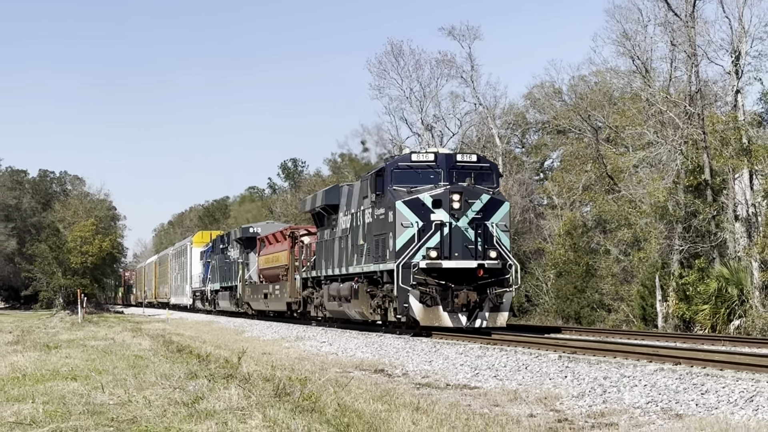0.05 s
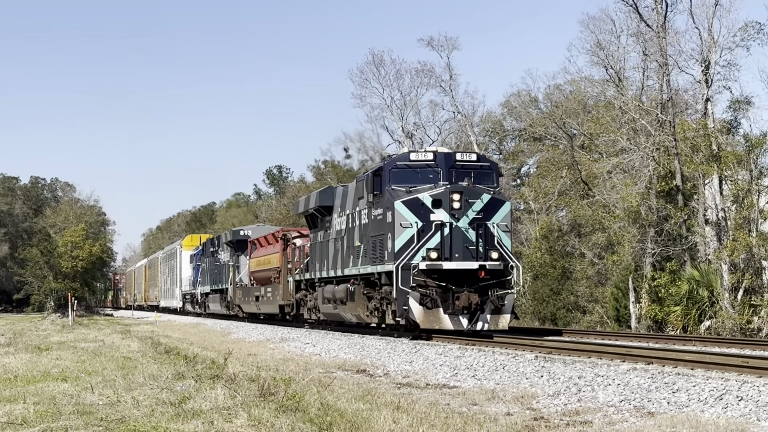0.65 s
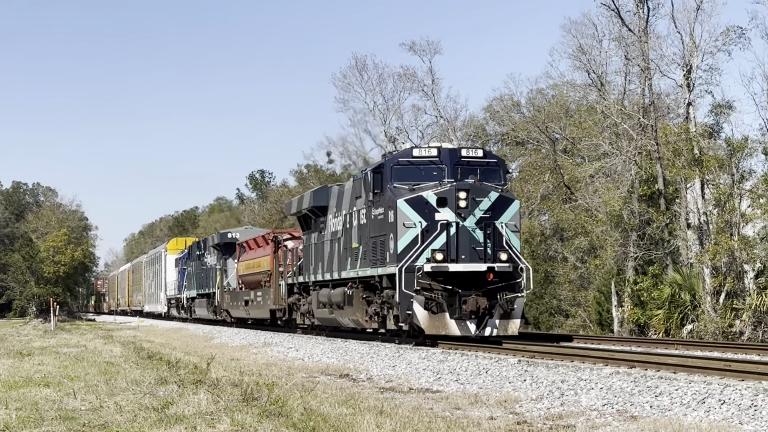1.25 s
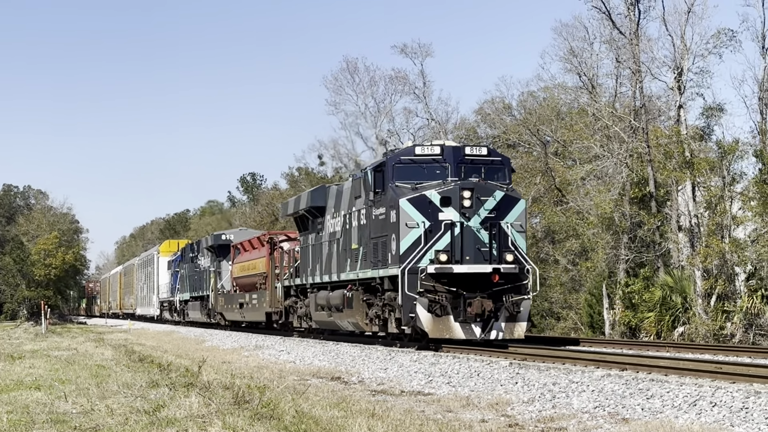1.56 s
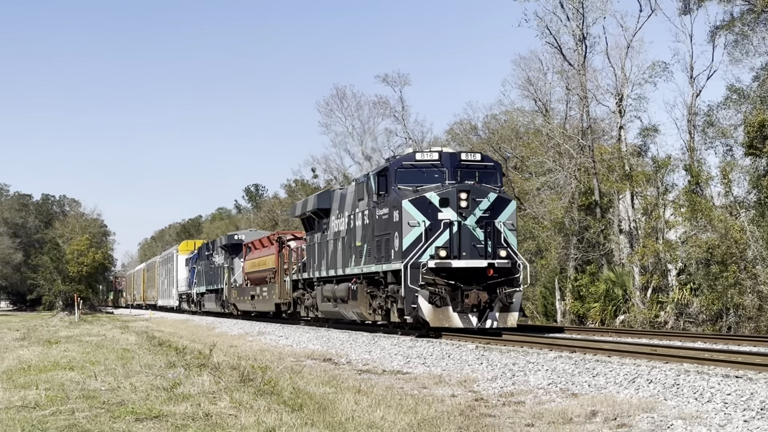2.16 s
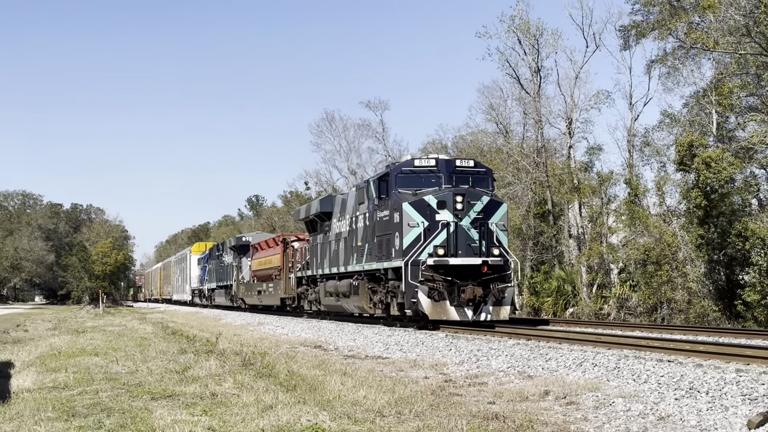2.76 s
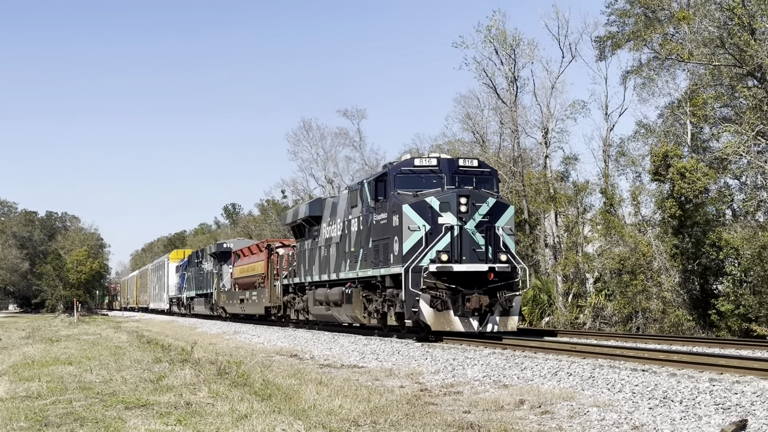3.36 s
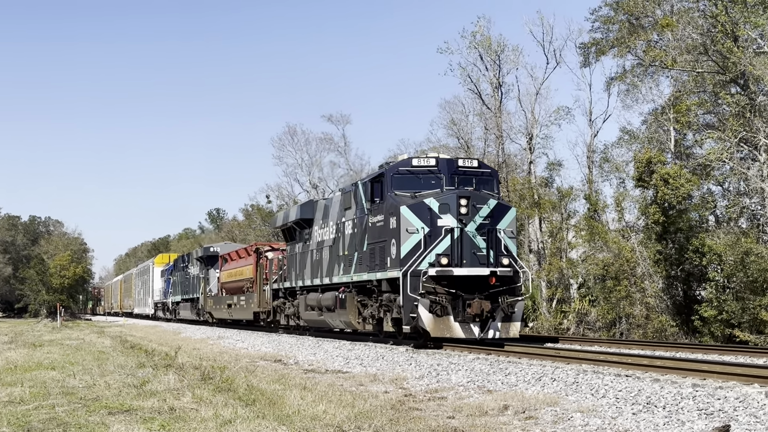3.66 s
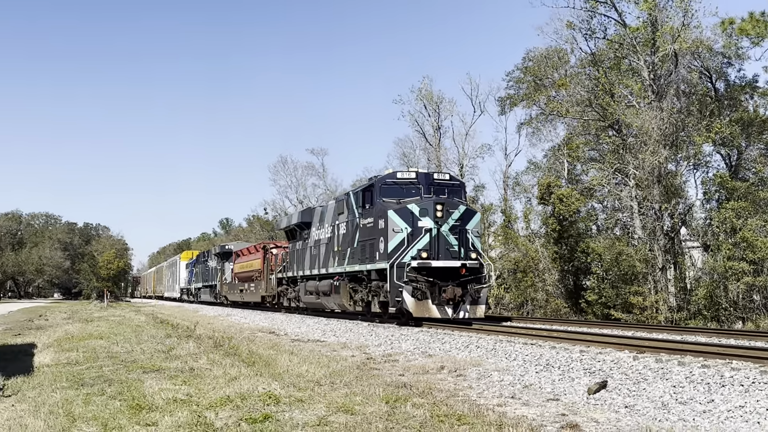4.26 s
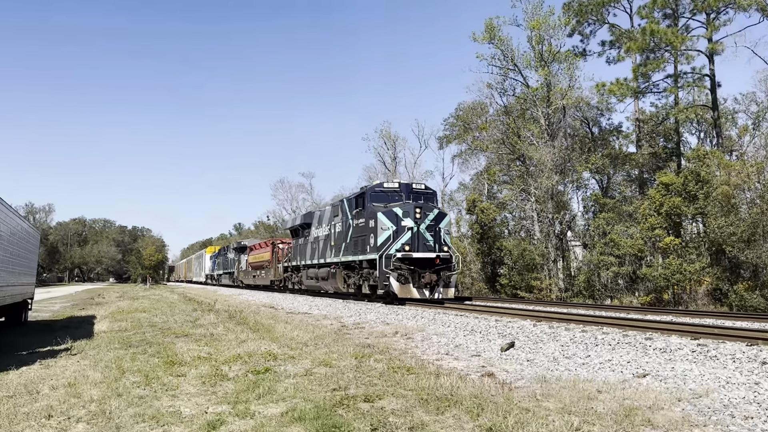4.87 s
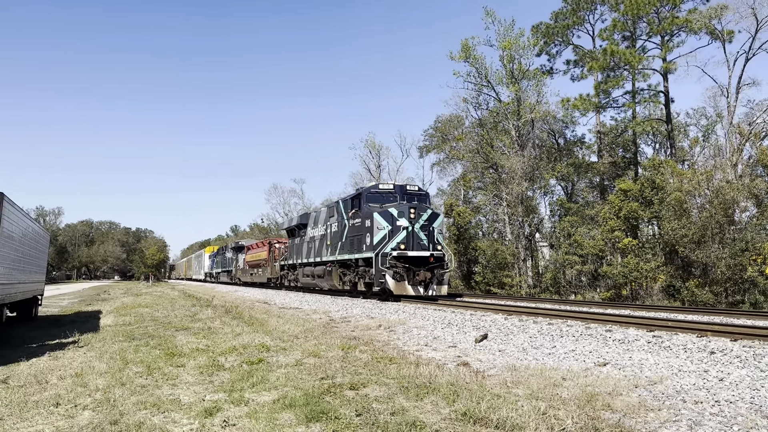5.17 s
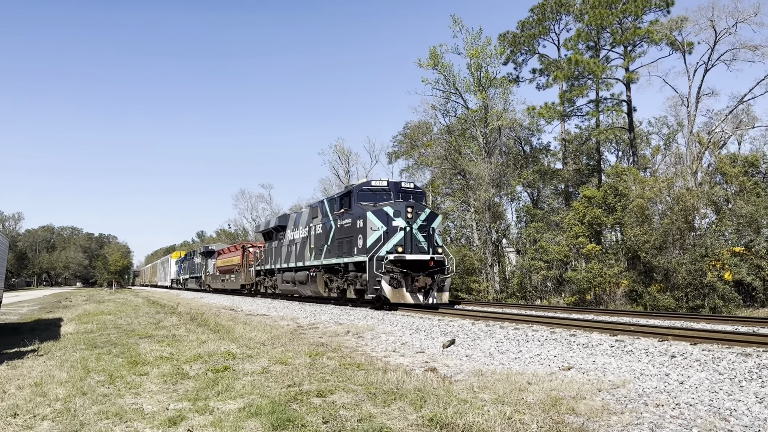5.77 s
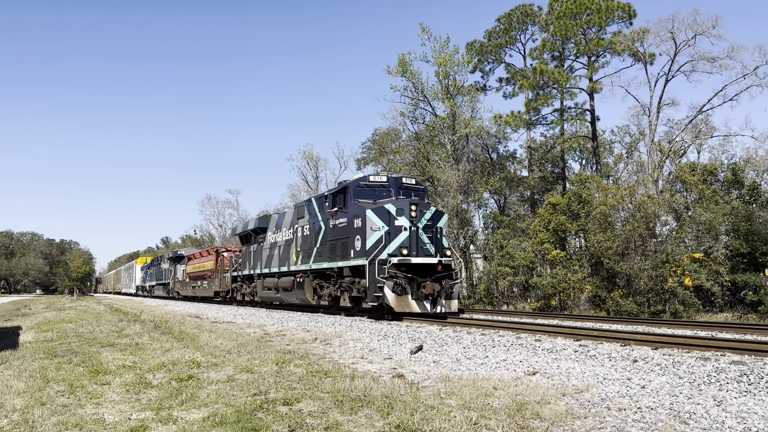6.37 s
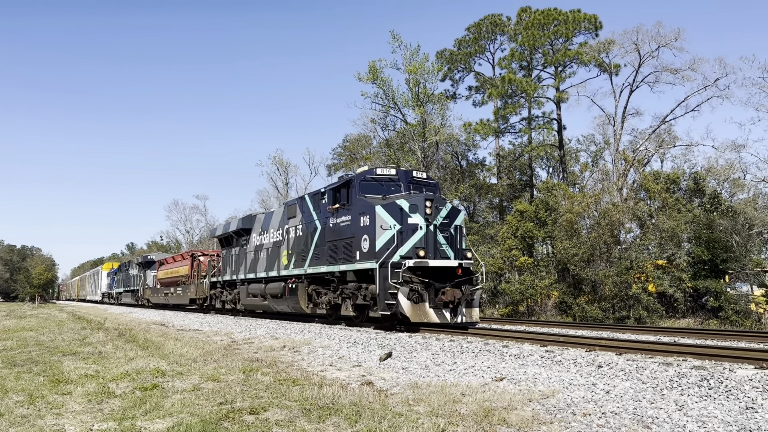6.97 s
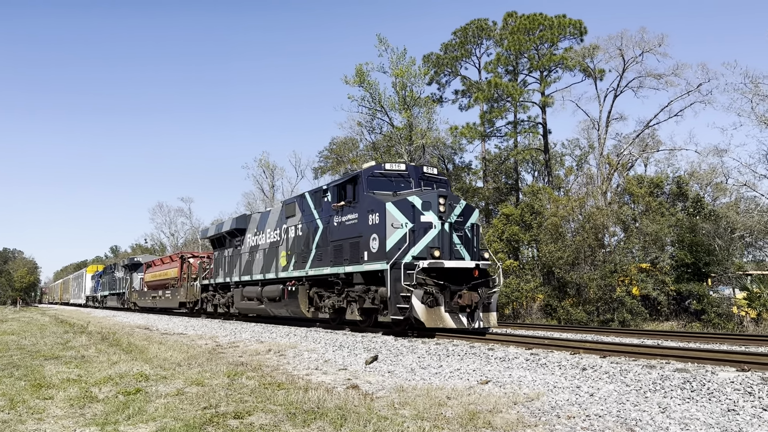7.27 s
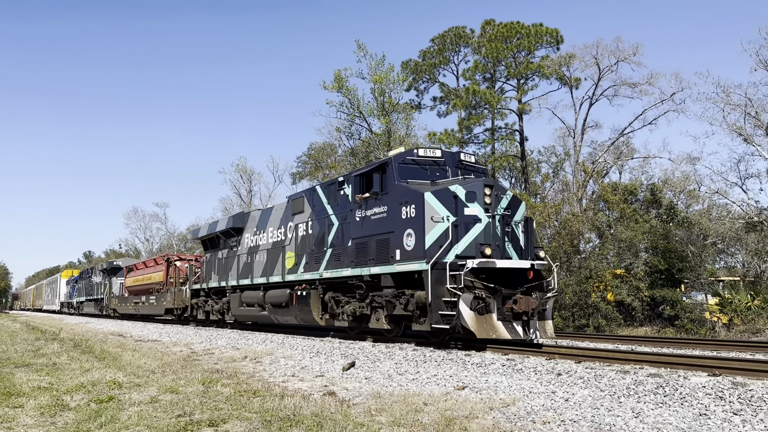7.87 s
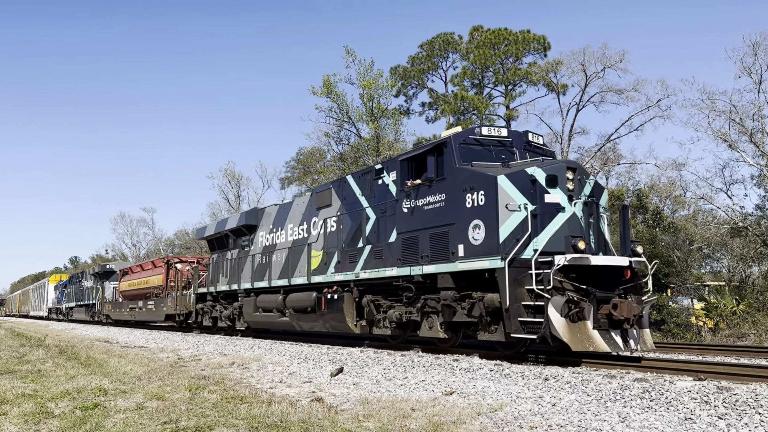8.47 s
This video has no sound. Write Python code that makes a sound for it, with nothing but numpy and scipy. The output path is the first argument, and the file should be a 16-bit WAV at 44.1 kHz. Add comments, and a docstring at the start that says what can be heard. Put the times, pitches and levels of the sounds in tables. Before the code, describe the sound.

A diesel freight train approaches outdoors, heard from beside the track. From the start, the engine gives a deep, steady drone with a fast throb, the main sound throughout. A warning bell strikes evenly, about every 0.7 seconds, echoing softly off the trees. Behind it, a broad roar of fans and rolling wheels, thin blower whines and light engine clatter slowly grow. From about 3 seconds a slightly rising hum swells, peaking near 6 seconds. At about 5 seconds the sound spreads wider between left and right. From 5.8 to 6.5 seconds come three sputtering bursts of hiss, like spitting compressed air, with rough whistles inside. Two brief spits follow around 8 seconds, then a longer, louder whistling sputter from 8.3 seconds until the end at about 8.7, as the roar and whines surge and the locomotive comes close.

```python
"""Beside a railway along a line of trees, a freight train behind diesel locomotives draws near.
Fans, gears and rolling wheels make a growing roar, engine and blowers whine and a warning bell tolls.
The main sound is the twelve-cylinder engine, whose two strongest exhaust tones beat into a throb.
Close by come sputtering bursts of hiss, like spitting compressed air, with rough whistles inside them.
A little past halfway, the sound spreads wider between left and right."""
import sys
import numpy as np
from scipy import signal
from scipy.fft import rfft, irfft, next_fast_len
from scipy.io import wavfile
from scipy.ndimage import uniform_filter1d, minimum_filter1d, map_coordinates

SR = 44100
rng = np.random.default_rng(int(sys.argv[2]) if len(sys.argv) > 2 else 0)


def inscribe(sig):
    """Save sig as 16-bit PCM at rate SR to the path in sys.argv[1].

    A 1-D sig is mono; a 2-D sig holds one channel per row.
    Samples are clipped to [-1, 1] before scaling.
    """
    pcm = np.round(np.clip(np.atleast_2d(sig).T, -1, 1) * 32767)
    wavfile.write(sys.argv[1], SR, pcm.astype(np.int16))


N = 384552
T = np.arange(N) / SR  # the time of every sample
HZ = np.fft.rfftfreq(2 * next_fast_len(N // 2 + SR // 8, real=True), 1 / SR)  # the pitches a filter sets


def amp(db):
    """Turns decibels into a number to multiply a sound by."""
    return 10 ** (np.asarray(db) / 20)


def unit(x):
    """Scales a signal to an average strength (rms) of 1."""
    return x / np.sqrt(np.mean(abs(x) ** 2) + 1e-20)


def over_time(rows):
    """Joins a table's (time, value) points with straight lines, giving a value for every sample."""
    rows = np.array(rows, float)
    return np.interp(T, rows[:, 0], rows[:, 1])


def over_pitch(rows, column=1):
    """Joins the points in one column of a pitch table, giving a value for every pitch in HZ."""
    rows = np.array(rows, float)
    return np.interp(np.log(HZ + 1), np.log(rows[:, 0]), rows[:, column])


def filtered(x, gain):
    """Turns each pitch in a sound up or down by its own gain."""
    return irfft(rfft(x, 2 * len(HZ) - 2) * gain)[..., :N]


def noise(db_per_hz):
    """Two unrelated noises with the given level at each pitch."""
    return filtered(rng.standard_normal((2, N)), amp(db_per_hz) * np.sqrt(SR / 2))


def drift(rate_hz, points=4096):
    """A smooth random wobble of strength 1 that moves up to about the given rate."""
    hz = np.fft.rfftfreq(points, N / SR / points)
    slow = irfft(rfft(rng.standard_normal(points)) * np.exp(-(hz / rate_hz) ** 2))
    return np.interp(T, np.linspace(0, N / SR, points), unit(slow))


def add(mix, start_s, sound):
    """Mixes a sound in at the given time."""
    part = mix[max(round(start_s * SR), 0):][:len(sound)]
    part += sound[:len(part)]


def tree_echo(x, fade_s=0.37):
    """The trees and the track stones scatter a sound into a soft echo."""
    t = T[:SR // 2]
    tail = rng.standard_normal(len(t)) * amp(-60 * t / fade_s)
    return signal.oaconvolve(x, tail / np.linalg.norm(tail))[:N]


# How near the train is (0 is far and head-on, 1 or more is close and side-on): time_s, nearness
TRAIN_NEARNESS = [(0, 0.032), (2.3, 0.12), (3.3, 0.28), (8.72, 1.266)]
# Engine speed as heard, lifted slightly by the approach: time_s, cycles_per_s
ENGINE_SPEED = [(0, 7.481), (3.5, 7.491), (8.72, 7.495)]
CYCLE_HZ = ENGINE_SPEED[0][1]


def train_motion():
    """Gives the count of four-stroke engine cycles so far, and how near the train is."""
    return np.cumsum(over_time(ENGINE_SPEED)) / SR, over_time(TRAIN_NEARNESS)


def arrival(level_at_s=8.74, surge_s=0.43):
    """Rises quickly from 0 toward 1 as the train's nose draws level with the listener."""
    return np.exp(np.minimum(T - level_at_s, 0) / surge_s)


# The roar's tone colour, before its overall swell: pitch_hz, far_db_per_hz, near_db_per_hz
ROAR_COLOUR = [(25, -70.5, -60.5), (70, -58.5, -47.5), (211, -51, -55), (340, -59, -59.5),
               (760, -64.5, -62), (890, -65, -70), (1106, -64.5, -60), (1280, -67.5, -72.5),
               (1560, -68, -67.5), (2280, -77, -74), (3100, -75.5, -74), (3530, -78, -78.5),
               (6100, -89.5, -83.5), (9530, -102.5, -89), (11200, -113.6, -105.0), (15500, -112.0, -105.2)]
# Humps and hollows made by sound bouncing off the ground close by: pitch_hz, width_hz, change_db
GROUND_BOUNCE = [(470, 120, 1), (3800, 460, -0.5), (5000, 410, 4.5), (6060, 590, -1.5)]


def roar(cycles, near, chuff=0.078, flutter_db=0.64):
    """Fans, gears and rolling wheels make a broad noise that grows and pulses as the cylinders fire."""
    share = np.clip(near, 0, 1)
    ground_db = sum(db * np.exp(-(2 * (HZ - hz) / width) ** 2) for hz, width, db in GROUND_BOUNCE)
    far_noise = noise(over_pitch(ROAR_COLOUR))
    near_noise = noise(over_pitch(ROAR_COLOUR, column=2) + ground_db)
    rush = np.sqrt(1 - share) * far_noise + np.sqrt(share) * near_noise
    firing = np.cos(2 * np.pi * 12 * cycles)  # twelve cylinders fire in each cycle
    swell_db = -2.5 + 3 * near + 2.8 * arrival()
    return rush * (1 + chuff * firing) * amp(swell_db + flutter_db * drift(12))


def rising_hum(start_s=2.8, start_hz=219.6, rise_hz_per_s=3.4, peak_s=6.04, swell_s=1.86, flutter=0.18):
    """A slowly rising machine hum swells and fades, with a quiet tone a fifth above."""
    phase = 2 * np.pi * np.cumsum(start_hz + rise_hz_per_s * (T - start_s)) / SR
    swell = np.exp(-((T - peak_s) / swell_s) ** 2)
    tone = amp(-32.5) * swell * unit(np.sin(phase))
    overtone = amp(-43) * unit(np.sin(1.5 * phase))
    fade_in = np.clip((T - start_s) / 0.34, 0, 1)
    return fade_in * sum(part * (1 + flutter * drift(3.5)) for part in (tone, overtone))


# Steady whines of the engine and blowers, before their last surge: pitch_hz, width_hz, far_db, near_db
MACHINE_WHINES = [(356.5, 3.7, -51, -42), (529, 2, -51, -46), (633, 2.3, -50.5, -47), (714.5, 4, -44, -41),
                  (745.5, 1.5, -53.5, -43.5), (766, 0.94, -50, -42), (1068, 4.4, -45.5, -45.5),
                  (1106, 78, -53.5, -47), (1437, 6.6, -52.5, -50.5), (3370, 11, -61.5, -60.5)]


def machine_whines(near, smear=0.85, flutter=0.31, surge_db=3):
    """Swirling air blurs the whines; they surge as the side vents turn toward the listener."""
    out = np.zeros(N)
    for hz, width_hz, far_db, near_db in MACHINE_WHINES:
        tone = np.sin(2 * np.pi * hz * T + smear * drift(width_hz))
        whine = unit(tone * (1 + flutter * drift(width_hz)))
        out += amp(far_db + (near_db - far_db) * near) * whine
    return out * amp(surge_db * arrival())


def valve_clatter(cycles, near, far_db=-41, near_db=-34, low_hz=300, high_hz=750, points=1024):
    """Valves and fuel injectors repeat the same rough pattern in every engine cycle."""
    hz = np.arange(points // 2 + 1) * CYCLE_HZ
    band = (hz / low_hz) ** 4 / (1 + (hz / low_hz) ** 4) / (1 + (hz / high_hz) ** 6)
    pattern = unit(irfft(rfft(rng.standard_normal(points)) * band))
    looped = map_coordinates(pattern, [cycles % 1 * points], mode="grid-wrap")
    return amp(far_db + (near_db - far_db) * near) * looped


# The bell's ringing tones: pitch_hz, far_db, near_db, ring_s (time to fade by 60 dB)
BELL_TONES = [(1558, -45.5, -37.5, 1.1), (1548, -46.5, -41, 1.2), (1733, -45, -35, 1.6),
              (2878, -44.5, -45.5, 1.5), (2853, -46, -49, 1.9), (4174, -54, -47, 1.9),
              (4400, -59, -59.5, 0.8)]


def bell(near, first_s=.125, every_s=.6748, rise_s=0.0063, sag=.005, sag_s=.25, uneven_db=2.0):
    """A clapper strikes at an even pace; the tones sink a little as they die and shimmer in moving air."""
    out, t = np.zeros(N), T[:SR]
    sagging_time = np.cumsum(1 - sag * (1 - np.exp(-(t / sag_s) ** 2))) / SR
    attack = 1 - np.exp(-t / rise_s)
    for hz, far_db, near_db, ring_s in BELL_TONES:
        tone, shimmer = np.zeros(N), 1.3 * drift(18)
        for strike_s in np.arange(first_s, T[-1], every_s):
            phase = 2 * np.pi * (hz * sagging_time + rng.random()) + np.interp(strike_s + t, T, shimmer)
            fade = amp(uneven_db * rng.standard_normal() - 60 * t / ring_s)
            add(tone, strike_s, attack * fade * np.sin(phase))
        flicker_db = 0.5 * drift(11)
        out += tone * amp(far_db + (near_db - far_db) * near + flicker_db)
    return out + 0.69 * tree_echo(out)


# Whistles that ring within the hiss bursts: start_s, end_s, pitch_hz, level_db
HISS_WHISTLES = [(5.8, 6.13, 3335, -40.5), (6.2, 6.72, 6880, -53), (7.967, 8.21, 7020, -43),
                 (8.267, 8.53, 3330, -37.5), (8.296, 8.8, 5420, -42), (8.47, 8.8, 3940, -39)]


def hiss_whistles(width_hz=35, fade_s=0.026):
    """Single narrow tones swell out of the hiss as rough whistles."""
    out = np.zeros(N)
    for start_s, end_s, hz, level_db in HISS_WHISTLES:
        fade = np.clip(np.minimum(T - start_s, end_s - T) / fade_s, 0, 1)
        ring = (drift(width_hz) + 1j * drift(width_hz)) * np.exp(2j * np.pi * hz * T)
        out += amp(level_db) * fade * unit(ring.real)
    return out


def sputter(length_s, level_db, change_db, gap_s=.0225, jitter=.12, build_s=0.017, release_s=.012):
    """The power of one hiss over time: quick sharp spits over a rush that builds up under them."""
    t = T[:SR]
    release = np.exp(-np.maximum(t - length_s, 0) / release_s)
    outline = amp(level_db + change_db * np.minimum(t / length_s, 1)) * release
    rush = amp(-3 + 2 * drift(60)[:SR]) * (1 - np.exp(-t / build_s))
    spit = np.exp(-t / .006) * (1 - np.exp(-t / .0007))  # snaps on, then dies quickly
    power, spit_s = rush ** 2, 0
    for lateness, strength in rng.standard_normal((24, 2)):
        spit_db = 8 + 2 * strength + 2 * (spit_s == 0)  # the first spit gets an extra push
        add(power, spit_s, (amp(spit_db) * spit) ** 2)
        spit_s += gap_s * np.exp(jitter * lateness)
    return power * outline ** 2


def mottled(x, patchy_db=2, ripple_db=2.0, ripple_hz=45):
    """Gives the hiss an uneven, patchy texture that swells and fades."""
    ripple = unit(uniform_filter1d(rng.standard_normal(len(HZ)), size=round(ripple_hz / HZ[1])))
    slices = signal.stft(filtered(x, amp(ripple_db * ripple)), nperseg=512, noverlap=384)[2]
    patches = uniform_filter1d(rng.standard_normal(slices.shape[1:]), size=4, axis=0)  # smooth in pitch
    patches = unit(uniform_filter1d(patches, size=16, axis=1))  # smooth in time
    return signal.istft(slices * amp(patchy_db * patches), nperseg=512, noverlap=384)[1][:, :N]


# Sputtering bursts of hiss: start_s, length_s, base_level_db, change_db (over the burst)
HISS_BURSTS = [(5.774, .37, -27.5, -3), (6.163, .11, -31, 3), (6.478, 0.057, -28, 3.5),
               (7.973, 0.077, -27, -6.5), (8.085, 0.031, -27.5, -8), (8.265, .46, -27.5, 4)]
# The tone colour of the hiss, in relative levels: pitch_hz, approaching_db, alongside_db
HISS_COLOUR = [(500, -6.5, -7.5), (1500, -1, 2), (2150, 0.5, 1), (3260, -3.5, -6.5), (4520, -6.5, -10.5),
               (5940, -6, -4), (7560, -2, -1), (8250, 1, 1), (9630, -3, -5), (10550, -15, -14),
               (12000, -12.5, -15), (13300, -8, -11.5), (15400, -2.5, -8.5)]


def air_hiss(echo_db=-5, echo_s=0.62, crisp_hz=5000, body_share=0.14, turn_start_s=6.5, turn_s=1.8):
    """Bursts of hiss sputter like spitting compressed air, and the trees answer with a short echo."""
    power = np.zeros(N)
    for start_s, length_s, level_db, change_db in HISS_BURSTS:
        add(power, start_s, sputter(length_s, level_db, change_db))
    tail = amp(-60 * T[:SR] / echo_s) ** 2
    echo = abs(signal.oaconvolve(power, tail / tail.sum())[:N])
    # The colour changes as the train comes alongside.
    side_on = np.clip((T - turn_start_s) / turn_s, 0, 1)
    approaching = unit(noise(over_pitch(HISS_COLOUR)))
    alongside = unit(noise(over_pitch(HISS_COLOUR, column=2)))
    hiss = unit(mottled(np.sqrt(1 - side_on) * approaching + np.sqrt(side_on) * alongside))
    # The treble follows every spit; the lower body rings on and swells more slowly.
    body = filtered(hiss, 1 / (1 + (HZ / crisp_hz) ** 6))
    treble = hiss - body
    return np.sqrt(power + amp(echo_db) ** 2 * echo) * treble + np.sqrt(body_share * power + echo) * body


# Exhaust tones, in relative levels (12 is the firing rate): multiple_of_cycle, far_db, near_db
EXHAUST_TONES = [(6, -28.5, -37.5), (7, -35.5, -37.5), (9, -29, -25.5), (10, -24, -31), (11, -25.5, -28),
                 (12, -12, -10.5), (13, -30, -28.5), (14, -32, -30.5), (15, -11, -11.5), (16, -31, -33.5),
                 (17, -37.5, -35), (18, -32, -31), (19, -34.5, -37), (20, -32, -32), (21, -30, -33.5),
                 (22, -35, -33), (25, -42.5, -40.5), (26, -36, -40), (27, -34, -31), (28, -26.5, -34),
                 (29, -39, -32), (31, -41, -37.5), (32, -38, -35), (34, -40.5, -39.5), (35, -41.5, -43),
                 (46, -47.5, -42), (47, -57, -48), (49, -54.5, -43.5), (53, -55.5, -41.5), (59, -47.5, -46),
                 (65.1, -50.5, -45)]
# How strongly the exhaust pipe barks: time_s, boost_db
PIPE_BARK = [(0, 0.5), (1.5, 3), (2.8, -0.5), (5, 3), (8.72, -5)]


def exhaust(cycles, near, bark_hz=210, bark_width_hz=45, first_bark_s=.045):
    """Uneven cylinders hum at multiples of the cycle; two beat into a throb, and the pipe barks."""
    out, bark_db = np.zeros(N), over_time(PIPE_BARK)
    since_bark = cycles - first_bark_s * CYCLE_HZ
    for multiple, far_db, near_db in EXHAUST_TONES:
        multiple = round(multiple)
        waver = 0.043 if max(far_db, near_db) > -18 else 0.19  # the two strongest tones are steadier
        in_bark = np.exp(-((multiple * CYCLE_HZ - bark_hz) / bark_width_hz) ** 2)
        level = amp(far_db + (near_db - far_db) * near + in_bark * bark_db) * (1 + waver * drift(1.3))
        # Head-on, the pipe's tones line up into one bark per cycle.
        out_of_step = (1 - in_bark * (1 - near)) * rng.random()
        out += level * np.sin(2 * np.pi * (multiple * since_bark + out_of_step) + waver * drift(1.3))
    return amp(-9 + 1.5 * near) * unit(out)


# How the two sides compare while the sound is narrow:
# pitch_hz, likeness (0 to 1), right_lag_rad, left_minus_right_db
NARROW_STEREO = [(100, 1, 0, .5), (400, .99, .15, 1.1), (800, .92, .4, 3.5), (1050, .94, .15, 1.5),
                 (1300, .87, -.1, 3.4), (2000, .96, 0, 0), (3500, .96, .6, 0), (6500, .98, .1, 0),
                 (8200, .95, 2.9, 0), (10500, .9, .2, 0)]
# The same once it is wide: pitch_hz, likeness (0 to 1), right_lag_rad, left_minus_right_db
WIDE_STEREO = [(100, 1, 0, .5), (400, .97, .3, 1.3), (850, .62, .9, 4), (1100, .82, .5, 1.8),
               (1330, .4, -2, 3.2), (1700, .7, .7, -1.6), (2200, .45, 2.9, -4.5), (3000, .55, 1, 1),
               (3800, .6, 1.6, 5), (5000, .72, .6, 6.5), (5700, .45, 1.3, 9), (8100, .93, 2.6, 3),
               (10500, .9, .1, 0), (13000, .9, -.1, 0), (15500, .7, -2.2, 0)]


def stereo(table, direct, scattered):
    """Both sides share the direct sound; the less alike they are, the more scatter the right gets."""
    likeness = np.clip(over_pitch(table), 0, 1)
    lag = over_pitch(table, column=2)
    lean = amp(over_pitch(table, column=3) / 2)
    left, right = np.array([lean, np.exp(-1j * lag) / lean]) / np.sqrt((lean ** 2 + lean ** -2) / 2)
    right_only = filtered(scattered, right * np.sqrt(1 - likeness ** 2))
    return np.array([filtered(direct, left), filtered(direct, right * likeness) + right_only])


def scene(lean_db=0.25, lag_s=0.00016, bright_db=4, bright_hz=6500, widen_at_s=4.955, widen_s=0.11):
    """Mixes the train, first bright and narrow, then wide; the exhaust reaches the left side first."""
    cycles, near = train_motion()
    throb = exhaust(cycles, near)
    engine = np.array([amp(lean_db) * throb, amp(-lean_db) * np.interp(T - lag_s, T, throb)])
    machinery = valve_clatter(cycles, near) + machine_whines(near) + rising_hum()
    machinery += bell(near) + hiss_whistles()
    train = np.array([machinery, tree_echo(machinery)]) + roar(cycles, near) + air_hiss()
    brighter = filtered(train, amp(bright_db * np.exp(-((HZ - bright_hz) / 1400) ** 2)))
    wide = np.clip((T - widen_at_s) / widen_s + .5, 0, 1)
    return engine + (1 - wide) * stereo(NARROW_STEREO, *brighter) + wide * stereo(WIDE_STEREO, *train)


def record(dry, ceiling=.925, top_hz=15850):
    """Turns the loudest throbs down for a moment, then cuts off the very highest treble."""
    allowed_gain = np.minimum(1, ceiling / (abs(dry).max(0) + 1e-9))
    smooth_gain = uniform_filter1d(minimum_filter1d(allowed_gain, size=600), size=600)
    treble_cut = signal.firwin(511, top_hz, window=("kaiser", 9), fs=SR)
    return signal.oaconvolve(dry * smooth_gain, treble_cut[None], "same")


dry = scene()
out = record(dry)
inscribe(out)
```